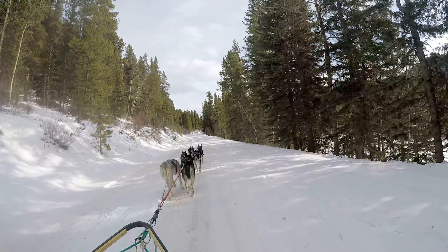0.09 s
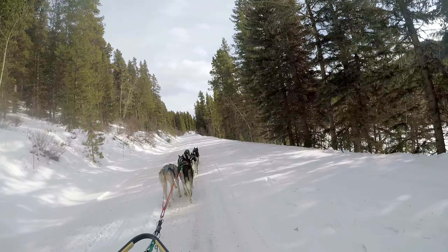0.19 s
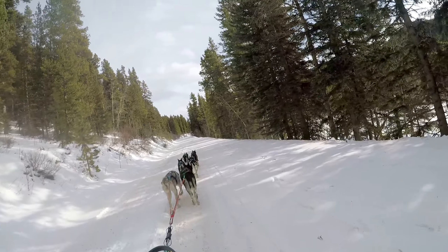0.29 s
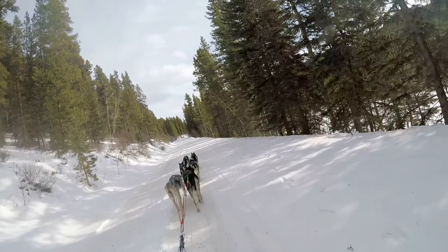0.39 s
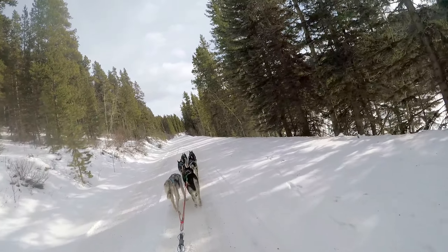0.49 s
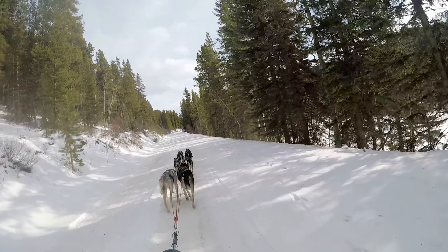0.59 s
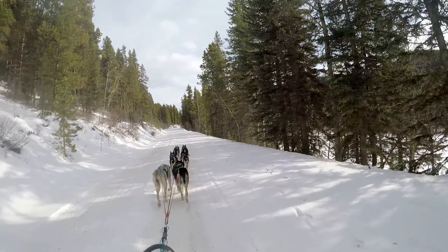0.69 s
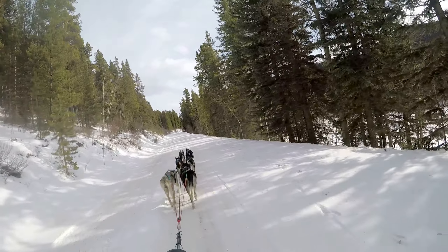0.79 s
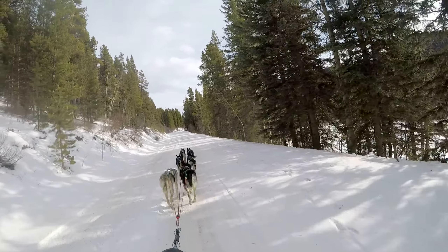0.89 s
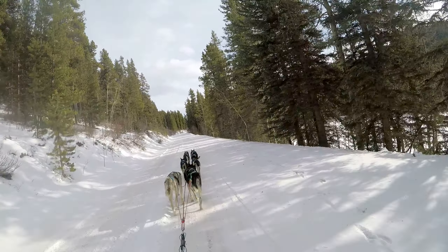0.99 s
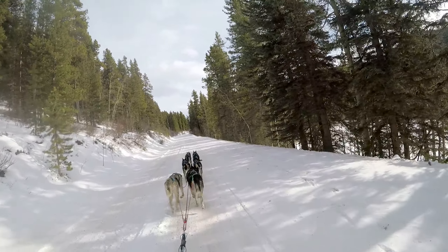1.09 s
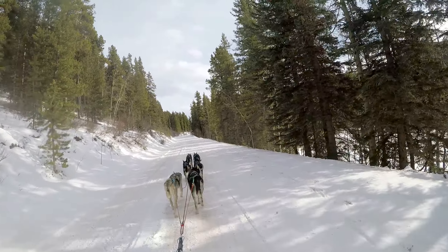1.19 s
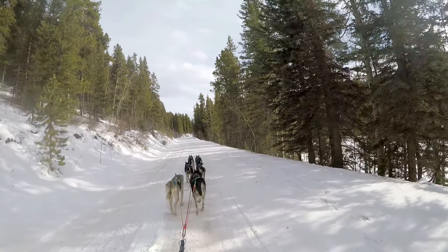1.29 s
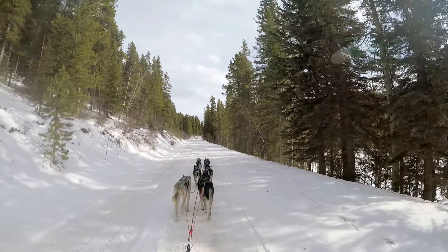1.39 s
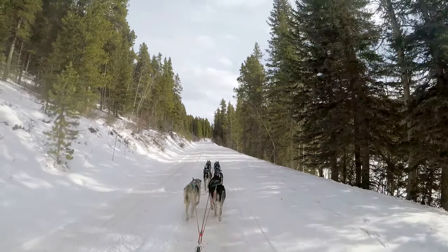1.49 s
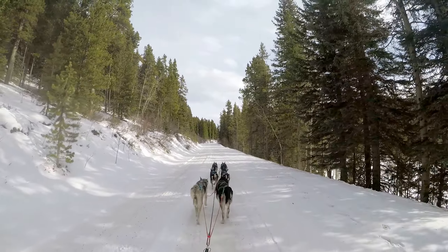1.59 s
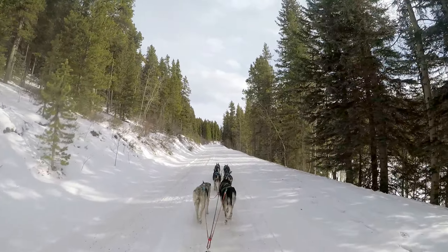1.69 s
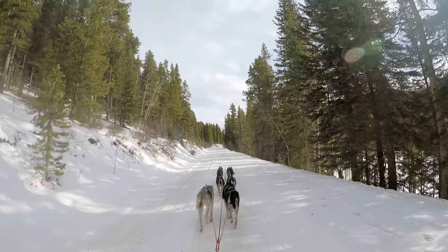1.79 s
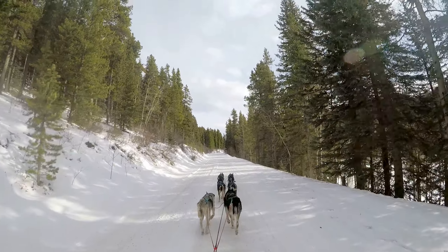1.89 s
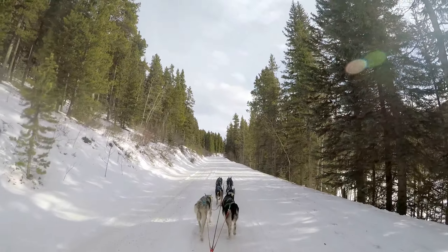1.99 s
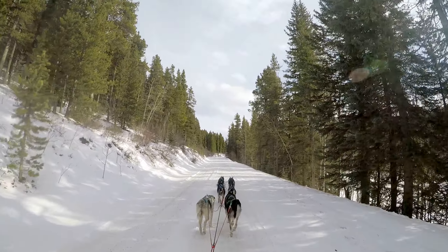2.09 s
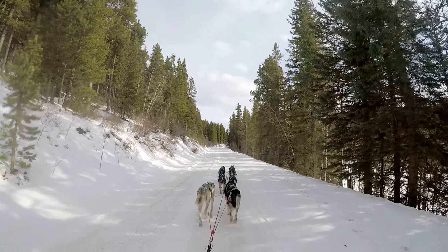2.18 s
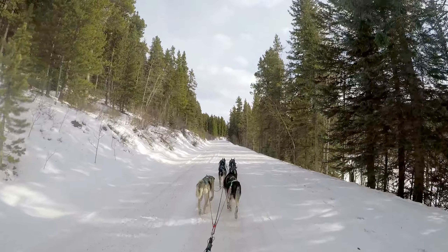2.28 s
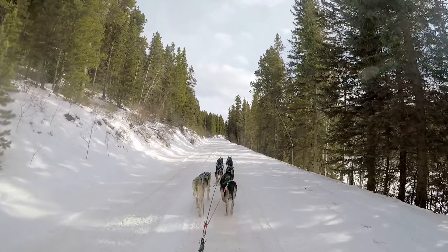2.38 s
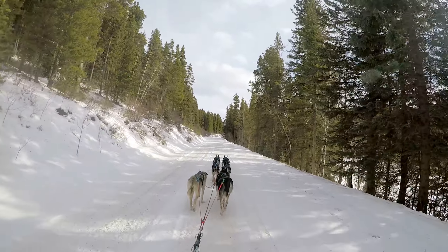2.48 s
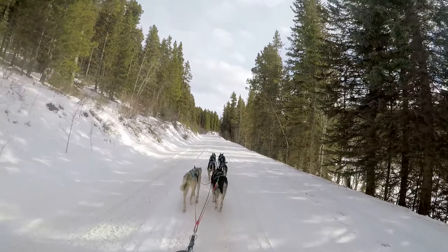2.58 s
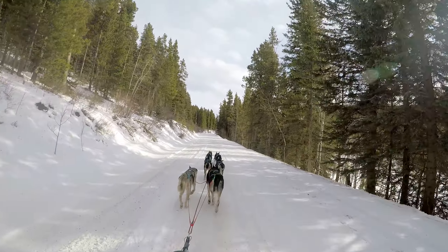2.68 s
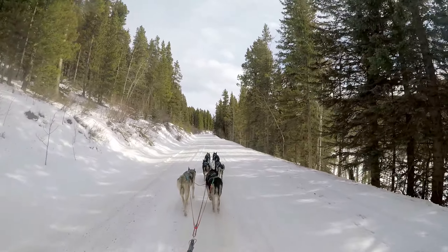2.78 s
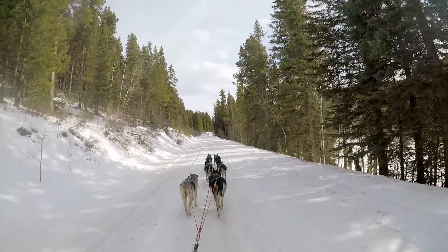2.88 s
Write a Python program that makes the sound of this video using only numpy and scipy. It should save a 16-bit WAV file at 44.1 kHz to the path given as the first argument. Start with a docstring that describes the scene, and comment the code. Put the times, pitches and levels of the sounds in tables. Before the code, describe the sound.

Sled runners scrape and hiss over packed snow, loudest in the first second, then fading. A clack comes at 0.4 seconds, and a cluster of knocks, thumps, crunches and gritty ticks runs from 0.7 to 1.5, with more near 1.8 and 2.2. The frame drums and briefly groans. Wind and shaking rumble on the sled's microphone, strongest from 1 second, dropping away at about 2.7.

```python
"""Dog sled on packed snow

The runners scrape and hiss, loudest in the first second. Bumps knock the frame and crush
bits of crust; grit ticks, the frame drums and groans, harness snaps clink. Wind and a
shaking mount rumble on the microphone, fixed to the sled, and drop away near the end."""
import sys
import numpy as np
from scipy.fft import rfft, irfft, next_fast_len
from scipy.io import wavfile
from scipy.ndimage import uniform_filter1d, map_coordinates

SR = 44100
rng = np.random.default_rng(int(sys.argv[2]) if len(sys.argv) > 2 else 0)


def bounce(signal):
    """Save signal as a 16-bit WAV file at the path given by the first command-line argument."""
    frames = np.transpose(np.atleast_2d(signal))
    limited = np.clip(frames, -1, 1)
    pcm = np.round(limited * 32767).astype(np.int16)
    wavfile.write(sys.argv[1], SR, pcm)


N = 130095
TIME_S = np.arange(N) / SR
SPLIT = np.array([[.5], [-.5]])  # shares a difference between left and right


def amp(db):
    """Decibels to gain."""
    return 10 ** (np.asarray(db) / 20)


def unit(x):
    """Scale to rms 1."""
    return x / np.sqrt(np.mean(x ** 2) + 1e-20)


def at_hz(points, hz):
    """Read (freq_hz, value) points on a log axis."""
    freq_hz, values = np.transpose(points)
    return np.interp(np.log(hz + 1), np.log(freq_hz + 1), values)


def level(rows):
    """(time_s, level_db) points to one gain per sample."""
    return amp(np.interp(TIME_S, *np.transpose(rows)))


def wobble(rate_hz):
    """Smooth random curve, rate_hz knots a second."""
    knots = rng.standard_normal(int(N * rate_hz / SR) + 4)
    return map_coordinates(knots, [TIME_S * rate_hz])


def filtered(x, response):
    """Apply a frequency response."""
    n = x.shape[-1]
    padded = next_fast_len(n + 8192)
    return irfft(rfft(x, padded) * response(np.fft.rfftfreq(padded, 1 / SR)), padded)[..., :n]


def stereo(pair, spectrum, coherence, lead):
    """Two independent signals to a coloured, partly coherent left and right of rms 1."""
    def mid_side_gains(hz):
        angle = np.arccos(np.clip(at_hz(coherence, hz), 0, 1)) / 2
        return amp(at_hz(spectrum, hz)) * [np.cos(angle), np.sin(angle)]

    mid, side = filtered(pair, mid_side_gains)
    left_right = np.array([mid + side, mid - side])
    return unit(filtered(left_right, lambda hz: np.exp(1j * SPLIT * at_hz(lead, hz))))


def grains(rate_hz, spread_db, friction_db):
    """Two streams of tiny fractures of scattered size over smooth friction noise."""
    hits = (rng.random((2, N)) < rate_hz / SR) * rng.standard_normal((2, N))
    sizes = amp(spread_db * np.clip(rng.standard_normal((2, N)), -2, 2))
    return unit(hits * sizes) + amp(friction_db) * rng.standard_normal((2, N))


def evened(x, window_s):
    """Flatten the slow swells of a noise."""
    size = max(int(window_s * SR), 2)
    power = uniform_filter1d(uniform_filter1d(np.mean(x ** 2, 0), size), size)
    return unit(x / np.sqrt(np.abs(power) + 1e-6))


def add(out, start_s, sound):
    """Mix a sound in at start_s."""
    part = out[:, round(start_s * SR):][:, :sound.shape[1]]
    part += sound[:, :part.shape[1]]


# Phase between the microphone ports, sliding and impact noise: freq_hz, left_lead_rad
SLIDE_LEAD = [(300, 0.37), (480, 2.25), (700, 2.87), (1000, 3.8), (1550, 3.87), (2600, 5.7), (7000, 8.06)]
# Left-right likeness, hard contact and loose snow: freq_hz, coherence
CONTACT_COHERENCE = [(350, 0.97), (700, 0.82), (1100, 0.91), (1500, 0.64), (2000, 0.79)]
SNOW_COHERENCE = [(1000, 0.21), (2000, 0.65), (2800, 0.21), (4000, .55), (6000, 0.85), (10000, 0.11)]
def burst(spectrum, coherence, t60_s, attack_s=0.00014):
    """Short decaying puff of stereo noise."""
    t = np.arange(SR // 4) / SR
    envelope = (1 - np.exp(-t / attack_s)) ** 2 * amp(-60 * t / t60_s)
    return envelope * stereo(rng.standard_normal((2, len(t))), spectrum, coherence, SLIDE_LEAD)


# Gusts: time_s, relative_db
WIND_LEVEL = [(0.0, -34), (0.53, -23.5), (0.68, -31.5), (0.73, -18.5), (1.02, -30.5), (1.13, -12),
              (1.18, -31), (1.28, -14), (1.6, -23), (1.74, -13), (1.85, -17), (1.9, -16), (2.32, -21.5),
              (2.4, -15), (2.56, -16.5), (2.65, -25), (2.71, -39.5), (2.95, -39.5)]
# Buffeting: freq_hz, gain_db
WIND_SPECTRUM = [(10, -22), (22, -5), (38, 3), (58, 1.5), (75, -4.5), (130, -19), (300, -67.5),
                 (1500, -120)]
# Left-right likeness: freq_hz, coherence
WIND_COHERENCE = [(60, 0.91), (120, 1), (300, 0.9)]
# Phase between the ports, wind and mount: freq_hz, left_lead_rad
RUMBLE_LEAD = [(40, 0.26), (150, 0.94)]
def wind():
    """Gusts buffet the microphone."""
    buffeting = stereo(rng.standard_normal((2, N)), WIND_SPECTRUM, WIND_COHERENCE, RUMBLE_LEAD)
    return amp(2) * level(WIND_LEVEL) * evened(buffeting, window_s=.06)


# Strength of the shaking: time_s, relative_db
MOUNT_LEVEL = [(0, -31.5), (.3, -26.5), (.42, -17.5), (.55, -24.5), (.78, -25.5), (.86, -15.5),
               (.97, -25.5), (1.03, -10), (1.07, -21.5), (1.2, -14.5), (1.23, -10), (1.4, -17),
               (1.49, -12.5), (1.7, -13), (1.82, -23), (1.9, -13), (1.95, -31.5), (2.0, -14), (2.19, -12.5),
               (2.24, -8.5), (2.29, -32), (2.36, -20), (2.56, -17), (2.68, -21), (2.78, -44), (2.95, -48)]
# Mount resonance: time_s, pitch_hz
MOUNT_PITCH = [(0, 90.7), (1.5, 85), (2.05, 83.85), (2.16, 101.2), (2.25, 85.1)]
def mount_shake(wander_hz=8.99, flutter_db=3):
    """The microphone mount shakes at a resonance that wanders in pitch and flutters in level."""
    pitch_hz = np.interp(TIME_S, *np.transpose(MOUNT_PITCH))
    phase = 2 * np.pi * np.cumsum(pitch_hz + wander_hz * wobble(45)) / SR
    tone = np.sin(phase + SPLIT * at_hz(RUMBLE_LEAD, pitch_hz))
    flutter = amp(flutter_db * wobble(27.91))
    return amp(-0.5) * level(MOUNT_LEVEL) * unit(flutter * tone)


# Strength of the drumming: time_s, relative_db
FRAME_LEVEL = [(0, -33), (0.2, -32.5), (0.35, -26), (0.67, -27), (0.85, -22.5), (1.05, -23.5), (1.3, -26),
               (1.62, -33.5), (1.74, -31), (1.83, -24.5), (1.94, -38), (2.06, -40), (2.16, -34),
               (2.3, -39.5), (2.41, -31), (2.72, -42), (2.82, -35), (2.95, -39)]
# Frame resonances: freq_hz, gain_db
FRAME_SPECTRUM = [(70, -30.5), (135, 3), (180, -2.5), (222, 3.5), (243, -2), (265, 2), (320, -2),
                  (385, -10), (800, -27.5), (3000, -72.5)]
# Left-right likeness: freq_hz, coherence
FRAME_COHERENCE = [(130, 0.88), (300, 0.48), (600, 0.21)]
# The frame shakes the ports out of step: freq_hz, left_lead_rad
FRAME_LEAD = [(140, 0.47), (300, 0.61), (600, 0.96)]
def frame_drumming():
    """Small jolts keep the sled frame drumming."""
    jolts = grains(rate_hz=300, spread_db=-1, friction_db=1.5)
    drumming = stereo(jolts, FRAME_SPECTRUM, FRAME_COHERENCE, FRAME_LEAD)
    return amp(-1.5) * level(FRAME_LEVEL) * evened(drumming, window_s=0.17)


def rough_tones(rows, jitter_rad, jitter_hz):
    """Short notes of unsteady phase that swell and fade."""
    out = np.zeros((2, N))
    for start_s, length_s, pitch_hz, level_db in rows:
        t = np.arange(int(length_s * SR)) / SR
        phase = 2 * np.pi * pitch_hz * t + jitter_rad * wobble(jitter_hz)[:len(t)]
        add(out, start_s, amp(level_db) * np.hanning(len(t)) * np.sin(phase)[None])
    return out


# Frame groans, harness clinks: start_s, length_s, pitch_hz, level_db
GROANS = [(0.905, 0.078, 150, -17), (1.31, .25, 314, -29.5), (1.77, 0.09, 208, -18.5)]
CLINKS = [(1.772, 0.0062, 4378, -44.5), (1.782, 0.0062, 3470, -39.5), (2.495, 0.022, 2040, -44)]
def groans_and_clinks():
    """The frame groans as it flexes; the harness snaps clink."""
    groans = rough_tones(GROANS, jitter_rad=0.18, jitter_hz=60)
    clinks = rough_tones(CLINKS, jitter_rad=0.92, jitter_hz=1000)
    return groans + clinks


# Grit and rigging ticks: start_s, level_db
TICKS = [(.975, -32.5), (1.008, -18.5), (1.059, -26.5), (1.275, -24), (1.516, -27), (1.794, -27),
         (1.863, -33), (1.882, -33), (2.539, -37.5)]
# One tick: freq_hz, gain_db
TICK_SPECTRUM = [(500, -15.5), (1200, 2), (1650, 5), (2100, 0), (2700, -19.5), (4000, -16), (9000, -48.5)]
def grit_ticks():
    """Grit and rigging give hard, dull ticks."""
    out = np.zeros((2, N))
    for start_s, level_db in TICKS:
        add(out, start_s, amp(level_db) * burst(TICK_SPECTRUM, CONTACT_COHERENCE, t60_s=0.022))
    return out


# Breaking crust: start_s, level_db, t60_s, left_minus_right_db, tilt_db_per_octave
CRUNCHES = [(0.894, -27, 0.099, -4, -12), (.925, -21, 0.053, -3, -13), (1.023, -31, 0.059, -5.5, -7.5),
            (1.099, -32, 0.048, -0.5, -0.5), (1.177, -30.5, 0.096, -2, -6.5),
            (1.199, -33.5, 0.042, -5.5, -9), (1.268, -39.5, 0.065, -3, -1.5), (1.289, -38, 0.04, 1.5, 4.5),
            (1.304, -39.5, 0.059, -5, 4), (1.3225, -29.5, 0.021, 4.5, -5), (1.33, -36.5, 0.033, 3, 1),
            (1.522, -33, .03, 3, -2), (1.785, -39, 0.035, 1, -4), (2.232, -22.5, 0.014, 0.5, -7),
            (2.238, -37.5, 0.13, -5, -12.5)]
# One crunch before its tilt: freq_hz, gain_db
CRUNCH_SPECTRUM = [(500, -22.5), (1500, -4), (3000, -3.5), (6200, 3), (7600, -5), (9500, -21.5),
                   (13500, -26.5), (15500, -51)]
def crust_crunches(pivot_hz=4000):
    """Bits of crust collapse under the runners in bright bursts."""
    out = np.zeros((2, N))
    for start_s, level_db, t60_s, pan_db, tilt in CRUNCHES:
        spectrum = [(hz, db + tilt * np.log2(hz / pivot_hz)) for hz, db in CRUNCH_SPECTRUM]
        add(out, start_s, amp(level_db + SPLIT * pan_db) * burst(spectrum, SNOW_COHERENCE, t60_s))
    return out


def ring(modes, lead_rad, attack_s=0.0011, scatter_db=1.5):
    """Struck modes, slightly different in level and pitch at every blow."""
    t = np.arange(SR // 4) / SR
    out = np.zeros((2, len(t)))
    for pitch_hz, gain_db, t60_s in modes:
        decay = amp(gain_db + rng.normal(0, scatter_db) - 60 * t / t60_s)
        detuned_hz = pitch_hz * (1 + rng.normal(0, 0.025))
        out += decay * np.sin(2 * np.pi * detuned_hz * t + SPLIT * lead_rad)
    return out * (1 - np.exp(-t / attack_s)) ** 2


# Trail bumps: start_s, thump_db, clack_db, clack_left_lead_rad
BUMPS = [(0.3574, -19, -11.5, 2), (0.702, -19.5, -15.5, 2.56), (.741, -13, -39, .5),
         (0.835, -13.5, -36.5, .6), (0.9238, -10, -12.5, 0.59), (1.008, -9.5, -20, 0.72),
         (1.148, -14, -11.5, 3.6), (1.18, -23, -13, 2.5), (1.197, -23.5, -19.5, 3.3),
         (1.271, -18.5, -18.5, 2.3), (1.296, -11.5, -24, 0.82), (1.4315, -36.5, -24.5, 2.2),
         (1.515, -34, -21.5, 2.7), (1.706, -18.5, -25.5, 2.9), (1.793, -19, -19, 2.6),
         (2.142, -26.5, -23, 2.8), (2.223, -20.5, -18, 2.3), (2.231, -20.5, -24, 2.4)]
# Low frame modes, higher runner modes: pitch_hz, gain_db, t60_s
FRAME_MODES = [(85, -5.5, 0.11), (136.5, 3, 0.072), (222.7, 2, 0.059), (263.3, 1.5, 0.081),
               (314, -16.5, 0.012)]
RUNNER_MODES = [(460, -2.5, .06), (659.5, 0, 0.051), (810, -2.5, 0.044), (1129, -13, 0.065),
                (1840, -17.5, 0.038), (2020, -13.5, 0.035)]
# Noise in each clack: freq_hz, gain_db
CRACK_SPECTRUM = [(150, -12), (500, 19), (900, 1), (2000, -16.5), (7000, -27.5), (14000, -56.5)]
def bump_knocks():
    """Each bump thumps the frame and clacks the runners."""
    out = np.zeros((2, N))
    for start_s, thump_db, clack_db, lead_rad in BUMPS:
        clack = ring(RUNNER_MODES, lead_rad)
        clack += amp(-6) * burst(CRACK_SPECTRUM, CONTACT_COHERENCE, t60_s=0.057)
        thump = ring(FRAME_MODES, lead_rad=0.15)
        add(out, start_s, amp(thump_db) * thump + amp(clack_db) * clack)
    return out


# Runner scrape, upper rasp, snow hiss: time_s, relative_db
SCRAPE_LEVEL = [(0, -39.5), (.12, -35), (.32, -26), (.42, -28.5), (.49, -25), (.7, -28.5), (.77, -34.5),
                (.89, -25.5), (1.0, -33), (1.12, -34.5), (1.18, -23), (1.26, -35.5), (1.4, -36.5),
                (1.5, -34), (1.68, -38), (1.86, -45), (2.02, -46.5), (2.14, -40), (2.32, -47), (2.5, -44),
                (2.7, -51.5), (2.95, -40)]
RASP_LEVEL = [(0, -40.5), (.24, -35.5), (.34, -33.5), (.42, -33.5), (.485, -27.5), (.52, -34), (.59, -29.5),
              (.64, -38.5), (.695, -28.5), (.74, -36), (.89, -33), (.95, -40.5), (1.0, -27.5), (1.1, -36),
              (1.19, -36), (1.33, -34.5), (1.41, -46.5), (1.75, -43), (2.0, -51.5), (2.7, -50.5),
              (2.95, -47)]
HISS_LEVEL = [(0.0, -44.5), (0.5, -44), (0.97, -44), (1.3, -50.5), (1.45, -53.5), (1.93, -57.5),
              (2.65, -60.5), (2.95, -56.5)]
# The same three layers: freq_hz, gain_db
SCRAPE_SPECTRUM = [(150, -11.5), (340, -13), (450, 1), (550, -9.5), (670, -1.5), (860, -2), (990, -14.5),
                   (1200, -13), (1450, -22), (2700, -52), (8000, -76.5)]
RASP_SPECTRUM = [(700, -10), (1150, 2), (1650, 1.5), (2080, 1.5), (2550, -16.5), (4000, -22), (8000, -43.5)]
HISS_SPECTRUM = [(400, -9), (1500, 4), (3300, 2), (4800, -2), (6200, 2.5), (7200, -2), (8300, -10),
                 (10000, -14), (12700, -25.5), (14500, -39)]
def runners(contact_judder_db=1.52, hiss_judder_db=1.0):
    """Snow grains scrape and rasp along the juddering runners; loose snow hisses."""
    scrape_grains = grains(rate_hz=830, spread_db=3.5, friction_db=5.5)
    rasp_grains = grains(rate_hz=900, spread_db=-1.5, friction_db=0.5)
    hiss_grains = grains(rate_hz=3000, spread_db=-3, friction_db=2)
    scrape = stereo(scrape_grains, SCRAPE_SPECTRUM, CONTACT_COHERENCE, SLIDE_LEAD)
    rasp = stereo(rasp_grains, RASP_SPECTRUM, CONTACT_COHERENCE, SLIDE_LEAD)
    hiss = stereo(hiss_grains, HISS_SPECTRUM, SNOW_COHERENCE, SLIDE_LEAD)
    contact = level(SCRAPE_LEVEL) * scrape + amp(-4) * level(RASP_LEVEL) * rasp
    loose_snow = amp(2) * level(HISS_LEVEL) * hiss
    judder = wobble(55)
    return amp(contact_judder_db * judder) * contact + amp(hiss_judder_db * judder) * loose_snow


def scene():
    """Everything that reaches the microphone on the sled."""
    glide = wind() + mount_shake() + frame_drumming() + runners()
    return glide + bump_knocks() + crust_crunches() + grit_ticks() + groans_and_clinks()


# Microphone port imbalance: freq_hz, left_minus_right_db
PORT_BALANCE = [(90, -2.5), (300, -2.5), (430, -0.5), (620, 1), (1000, -2), (1600, -5.5), (2300, -1.5),
                (2950, -5), (4000, -2), (6800, -.5), (9000, -2.5)]
def record(dry, ceiling=.95, hardness=8, cutoff_hz=15600):
    """Colour each port, round the highest peaks, limit the band."""
    coloured = filtered(dry, lambda hz: amp(SPLIT * at_hz(PORT_BALANCE, hz)))
    rounded = coloured / (1 + np.abs(coloured / ceiling) ** hardness) ** (1 / hardness)
    return filtered(rounded, lambda hz: hz < cutoff_hz)


dry = scene()
out = record(dry)
bounce(out)
```